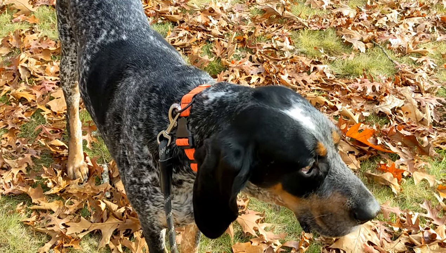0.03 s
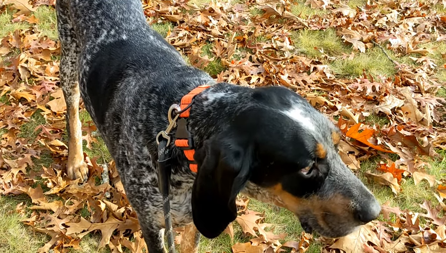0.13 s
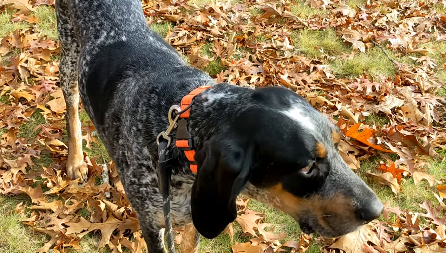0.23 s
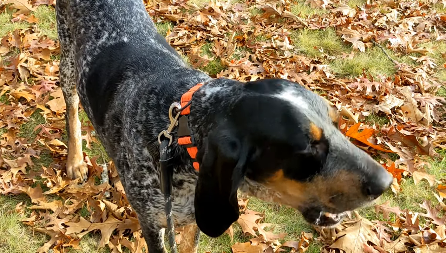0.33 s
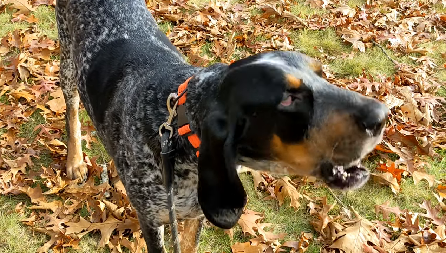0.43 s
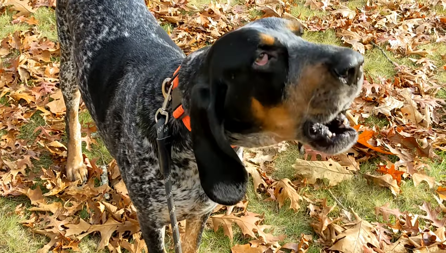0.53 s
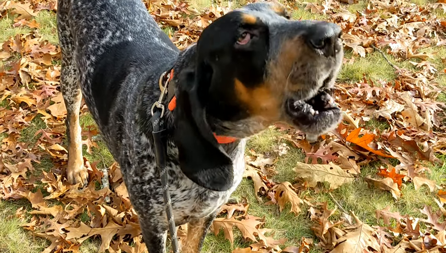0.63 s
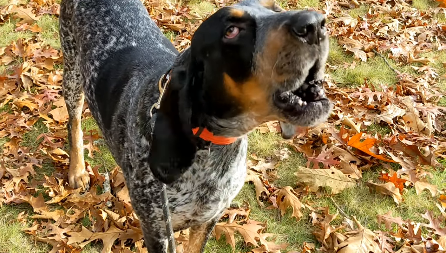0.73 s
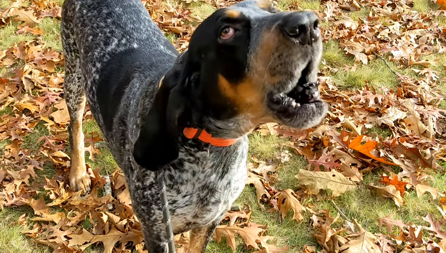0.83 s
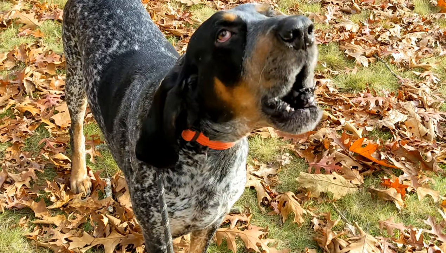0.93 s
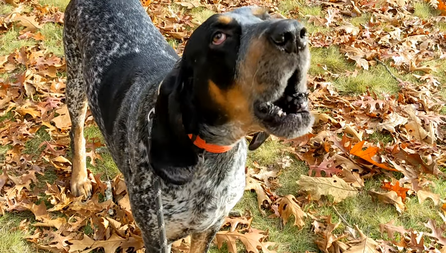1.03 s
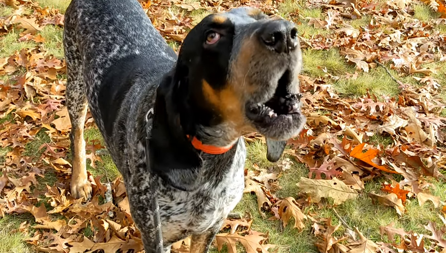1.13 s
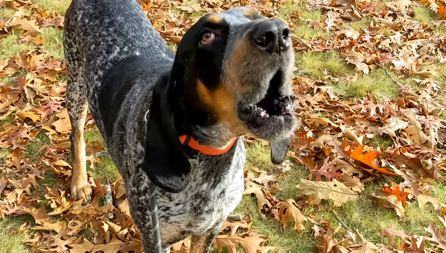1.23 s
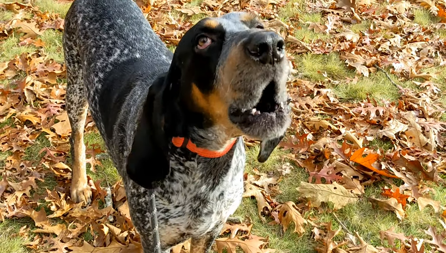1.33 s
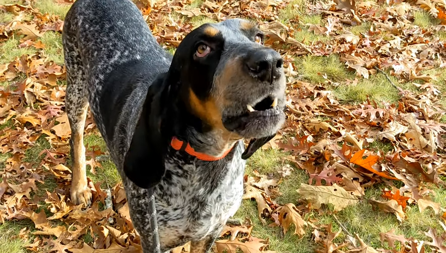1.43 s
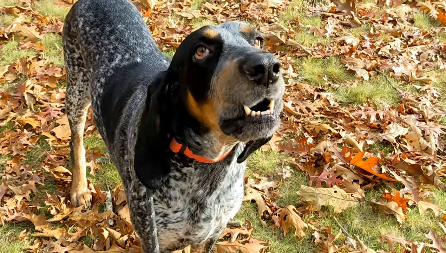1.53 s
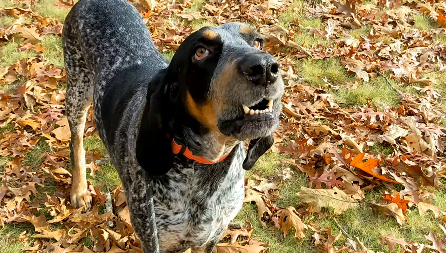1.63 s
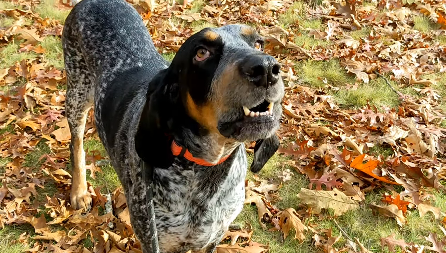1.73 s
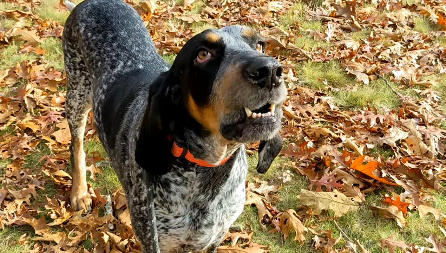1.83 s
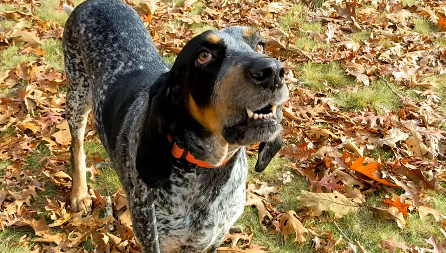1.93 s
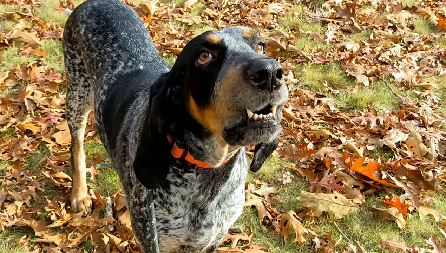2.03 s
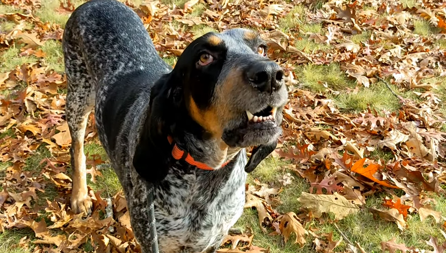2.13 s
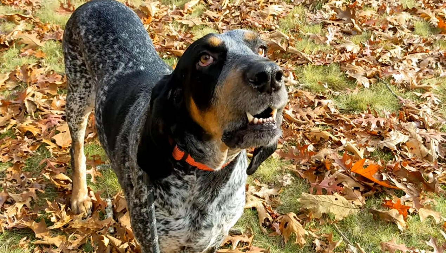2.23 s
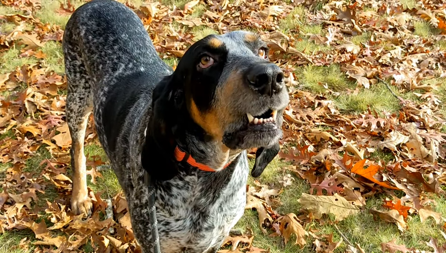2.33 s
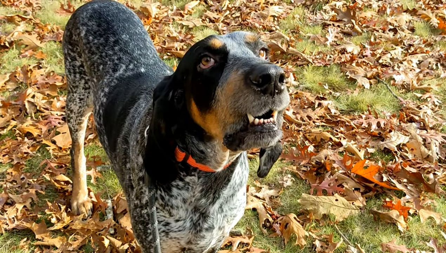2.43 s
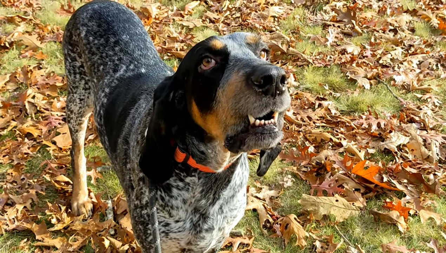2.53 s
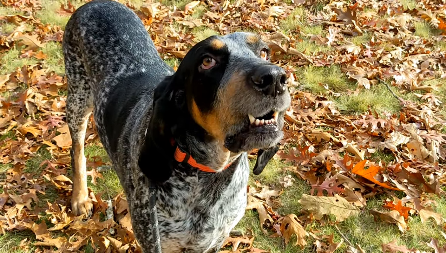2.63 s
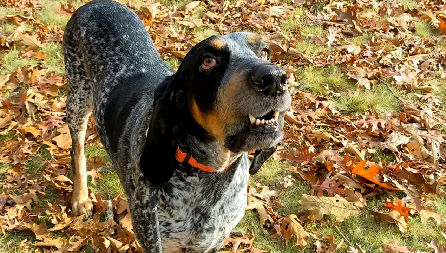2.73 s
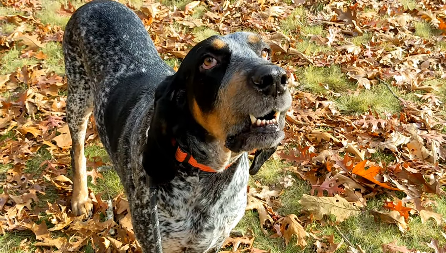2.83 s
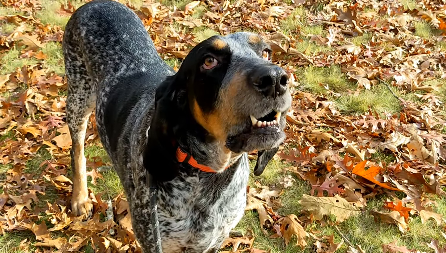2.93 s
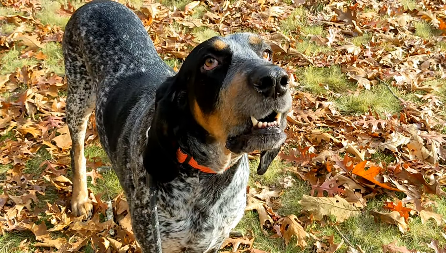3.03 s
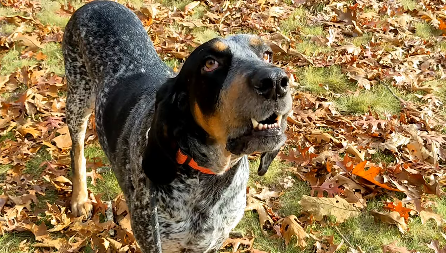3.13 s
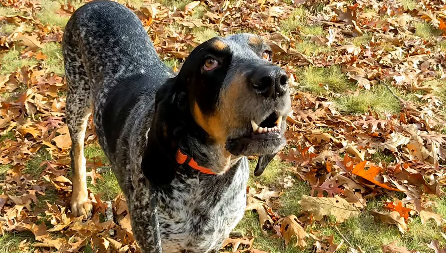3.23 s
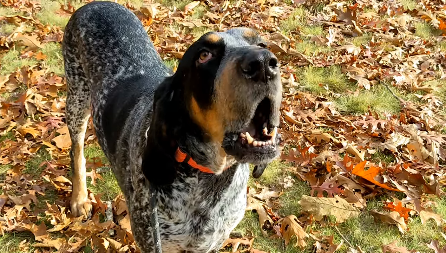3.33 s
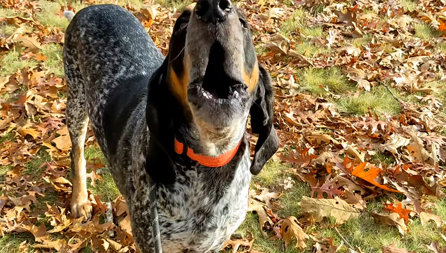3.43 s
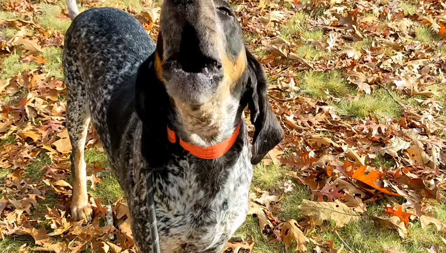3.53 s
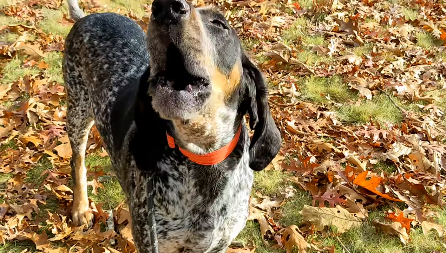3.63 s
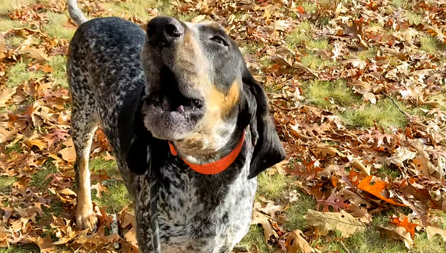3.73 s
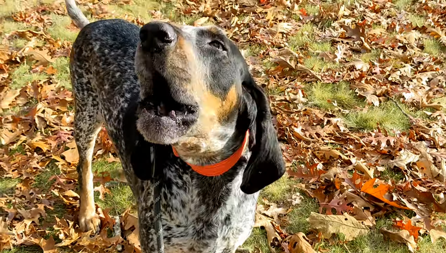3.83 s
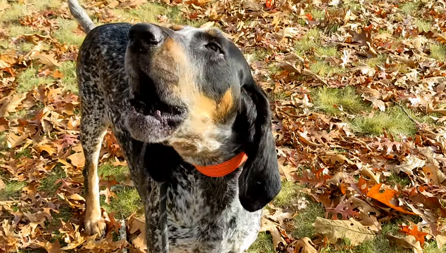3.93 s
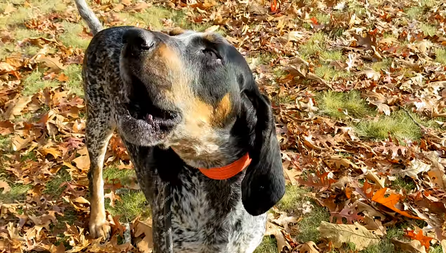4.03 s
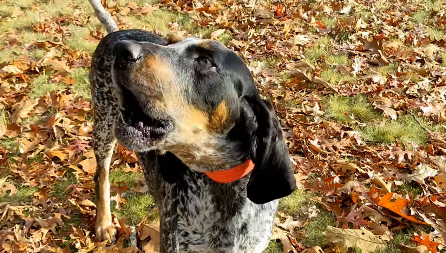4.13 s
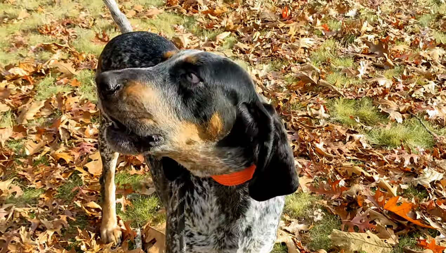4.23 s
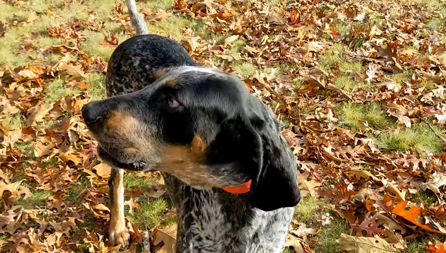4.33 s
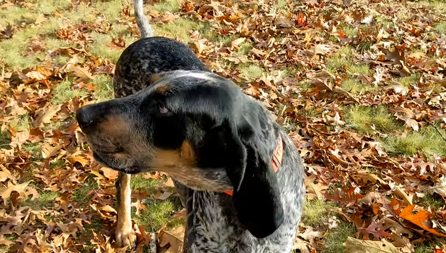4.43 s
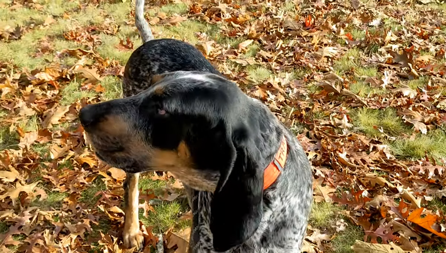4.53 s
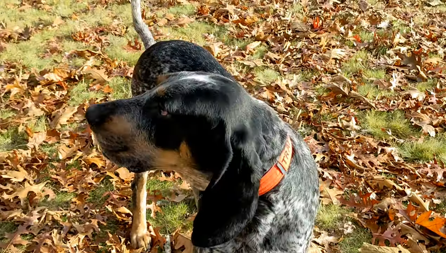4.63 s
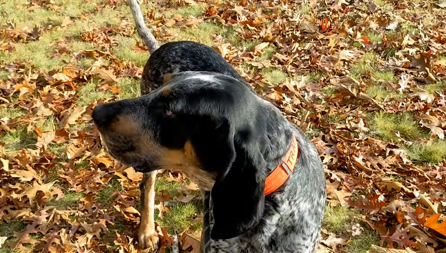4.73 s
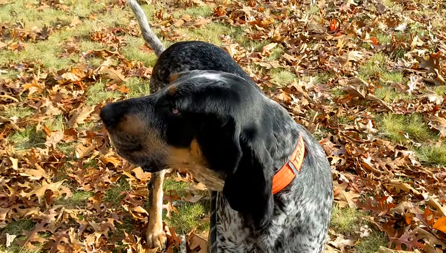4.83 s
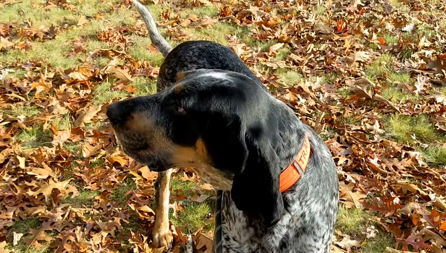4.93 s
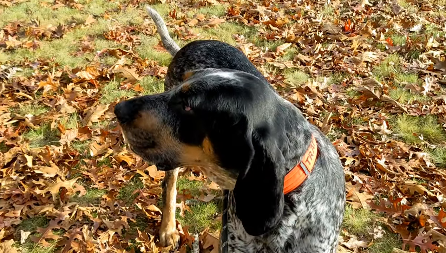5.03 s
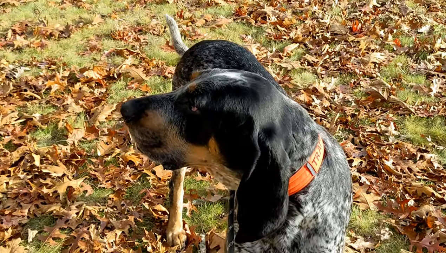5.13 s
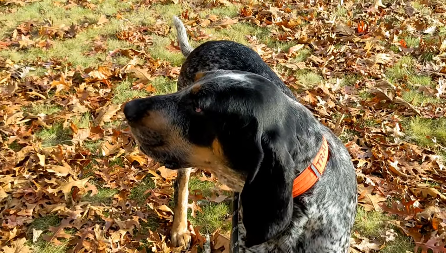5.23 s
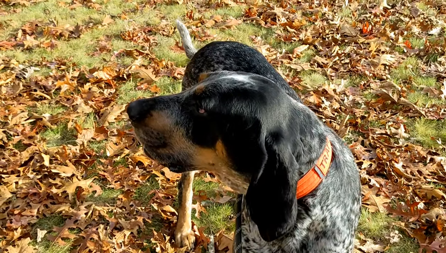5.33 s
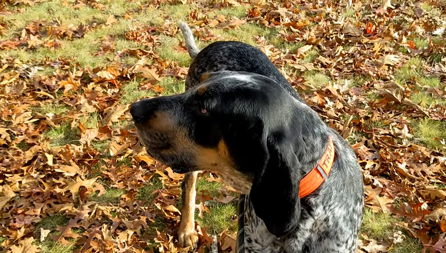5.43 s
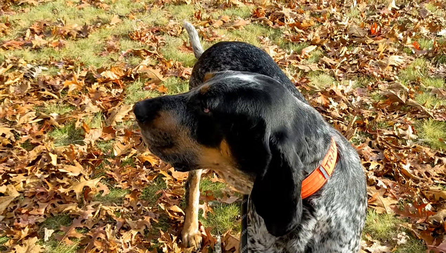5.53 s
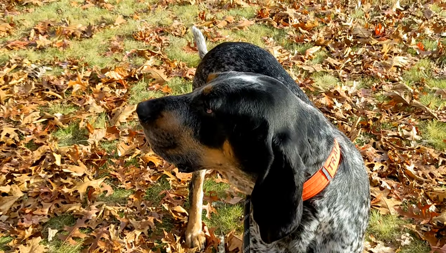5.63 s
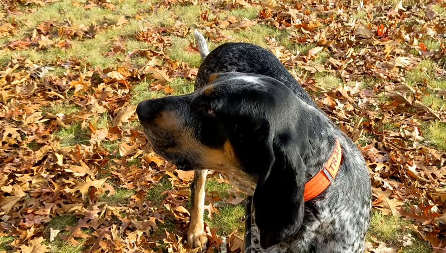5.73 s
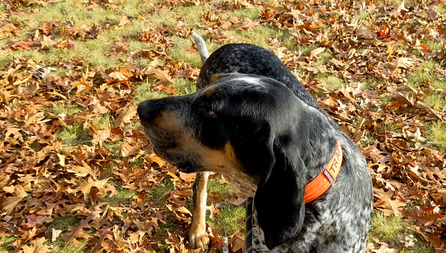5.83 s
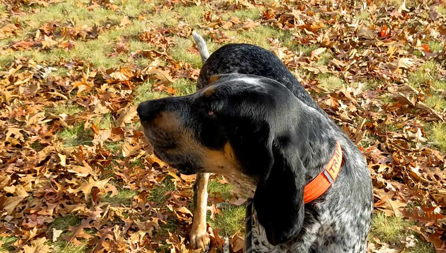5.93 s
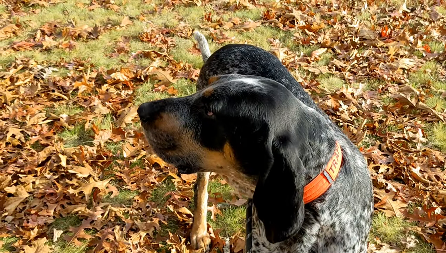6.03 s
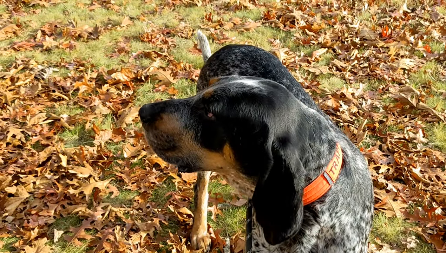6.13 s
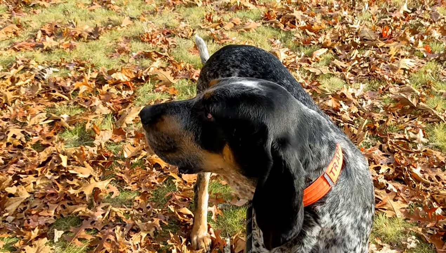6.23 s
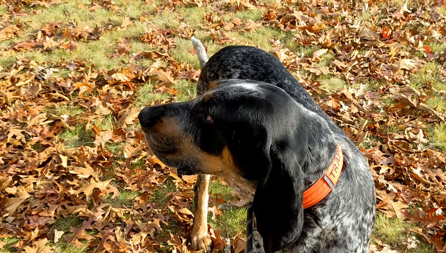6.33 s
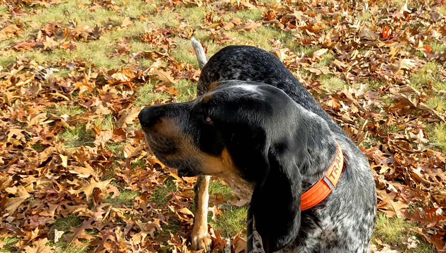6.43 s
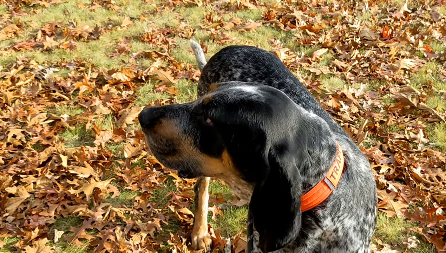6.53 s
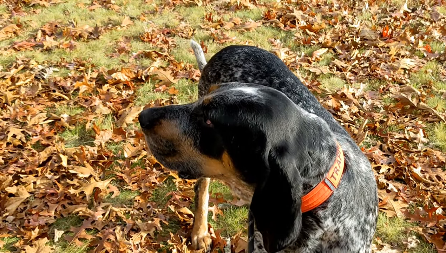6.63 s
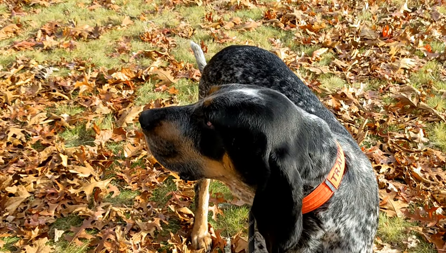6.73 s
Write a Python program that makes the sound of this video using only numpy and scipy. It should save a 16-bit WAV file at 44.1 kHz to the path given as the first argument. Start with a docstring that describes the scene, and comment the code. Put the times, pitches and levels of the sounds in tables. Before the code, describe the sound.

Close outdoor sound of one hound: faint whistle-like whines, a full-throated bay that breaks in pitch and sustains, a pause filled with quiet nasal whines, then another bay with a raspier start. Afterward only three short falling whines remain. The background is quiet, a low distant traffic hum and airy hiss; trees and walls answer very faintly.

```python
"""A leafy yard: a hound bays twice close to a stereo microphone. Its voice breaks between registers, rattles
into half-pitch lines, then holds a clear note: fold partials through throat and mouth resonances, plus noise.
Around the bays it whines: a thin gliding whistle with overtones on a puff of breath.
Far traffic hums low and the air hisses, both shaped stereo noise; walls and trees answer faintly."""
import sys
import numpy as np
from scipy import signal
from scipy.fft import rfft, irfft, next_fast_len
from scipy.io import wavfile
from scipy.ndimage import uniform_filter1d, minimum_filter1d, map_coordinates

SR = 44100
rng = np.random.default_rng(int(sys.argv[2]) if len(sys.argv) > 2 else 0)


def int16_out(signal):
    """Quantize to a 16-bit WAV file."""
    q = np.round(np.clip(np.atleast_2d(signal).T, -1, 1) * 32767)
    wavfile.write(sys.argv[1], SR, q.astype(np.int16))


def rack_gain(trim_db):
    """Turn a fader trim in dB into the linear factor to multiply a signal by."""
    fader = np.asarray(trim_db, float)
    return 10 ** (fader / 20)


N = 299871


def unit(x):
    """Scale to rms 1."""
    return x / np.sqrt(np.mean(x ** 2) + 1e-20)


def along(points, hz):
    """Interpolate (Hz, value) points on a log frequency axis."""
    f, v = np.transpose(points)
    return np.interp(np.log(hz + 1), np.log(f + 1), v)


def wobble(rate_hz, size=N):
    """A smooth random curve, rate_hz knots a second."""
    knots = rng.standard_normal(int(size * rate_hz / SR) + 4)
    return map_coordinates(knots, [np.arange(size) * rate_hz / SR])


def filtered(x, response):
    """Filter x by a complex response of frequency."""
    m = next_fast_len(x.shape[-1] + 8192)
    spectrum = rfft(x, m) * response(np.fft.rfftfreq(m, 1 / SR))
    return irfft(spectrum, m)[..., :x.shape[-1]]


def below(hz, edge_hz, order):
    """Steep low-pass gain."""
    return 1 / (1 + (hz / edge_hz) ** order)


def rings(modes, hz):
    """Gain of a set of resonances, each applied twice so that the valleys stay dark."""
    return sum(rack_gain(db) * (hz * width) ** 2 / ((centre ** 2 - hz * hz) ** 2 + (hz * width) ** 2)
               for centre, width, db in modes)


def whine(start_s, length_s, top_hz, sag_hz_per_s, first_db, last_db, octave_db):
    """A whistle flicks up, then sags towards a floor pitch or rises; overtones and hissing breath join it."""
    # lowest line thins or pitch catches: centre_s, half_length_s, loss_db, drop_hz (negative: gain, rise)
    catches = [(1.955, 0.034, 16, -1), (2.065, 0.086, -1, 333), (2.455, 0.091, 12.5, 1.5),
               (2.558, 0.05, 8, -10), (2.637, 0.044, 14, 1), (2.884, .035, -1, 248),
               (3.268, .03, -0.5, 50.5), (3.345, 0.029, -3, 80), (4.993, 0.05, 11, 3.5),
               (5.543, .07, 0, -50.5), (5.722, 0.013, 25, 0), (5.75, 0.037, 15, 40), (6.223, .04, 3, 48),
               (6.294, 0.13, 21.5, 27), (6.366, 0.034, 3, 300)]
    # breath resonances: centre_hz, width_hz, level_db
    nose = [(547, 150, -2.5), (1556, 86, 3.5), (3390, 1200, -2), (7000, 560, -6.5)]
    floor_hz, flick_hz, flick_s = 2302, 200, 0.032
    swell_s, release_s, overtone_release_s = 0.013, 0.018, 0.05
    octave_db_per_hz, octave_loss_share = 0.025, 0.2
    fourth_db, waver_db, breath_db = -11, 2.5, -62  # fourth is relative to the octave

    u = np.arange(round(length_s * SR)) / SR
    n = len(u)
    at, half_s, loss_db, drop_hz = np.transpose(catches)[..., None]
    catch = np.cos(np.pi / 2 * np.clip((start_s + u - at) / half_s, -1, 1)) ** 2
    loss_db = np.sum(loss_db * catch, axis=0)

    rise_s = min(flick_s, 0.2 * length_s)  # short whines flick faster
    glide = np.maximum(top_hz - sag_hz_per_s * np.maximum(u - rise_s, 0), floor_hz)
    glide = glide - flick_hz * np.clip(1 - u / rise_s, 0, 1) ** 2
    hz = uniform_filter1d(glide, size=600, mode="nearest") - np.sum(drop_hz * catch, axis=0)
    jitter = 0.004 * wobble(40, n) + 0.004 * wobble(14, n)
    phase = 2 * np.pi * np.cumsum(hz * (1 + jitter)) / SR

    low_db = first_db + (last_db - first_db) * u / length_s - loss_db
    # the octave weakens as the pitch sags; overtones fade ahead of the end
    high_db = octave_db + octave_db_per_hz * (hz - top_hz) - octave_loss_share * loss_db
    high_db += 20 * np.log10(np.clip((length_s - u) / overtone_release_s, 1e-3, 1))
    partials = [(1, low_db), (2, high_db), (4, high_db + fourth_db)]
    tone = sum(np.sqrt(2) * rack_gain(db + waver_db * wobble(31.3, n)) * np.sin(k * phase) for k, db in partials)
    edge = np.clip(np.minimum(u / swell_s, (length_s - u) / release_s), 0, 1) ** 2

    puff = np.abs(np.sin(np.pi * u / length_s)) ** 0.5 * rack_gain(3.6 * wobble(16.0, n))
    hiss = unit(filtered(rng.standard_normal(n), lambda f: rings(nose, f)))
    breath = rack_gain(breath_db) * puff * hiss
    first = SR + round(start_s * SR)  # one spare second ahead lets a whine start before zero
    return np.pad(tone * edge + breath, (first, N))[SR:SR + N]


def rush(spectrum, alike, patchy_db):
    """Stereo noise of rms 1: coloured, partly shared by the sides, with patches of random gain."""
    z = signal.stft(rng.standard_normal((2, N)), nperseg=512)[2]
    field = uniform_filter1d(rng.standard_normal(z.shape[1:]), 6, 0)
    field = uniform_filter1d(field, 14, 1)
    pair = signal.istft(z * rack_gain(patchy_db * unit(field)), nperseg=512)[1][:, :N]

    def mid_side_gain(hz):
        turn = np.arccos(np.clip(along(alike, hz), -1, 1)) / 2
        return rack_gain(along(spectrum, hz)) * [np.cos(turn), np.sin(turn)]
    mid, side = filtered(pair, mid_side_gain)
    return unit(np.array([mid + side, mid - side]))


def background():
    """Low traffic that swells slowly, even air hiss, and a thin treble hiss that comes and goes."""
    # traffic spectrum, relative: freq_hz, density_db_per_hz
    traffic_spectrum = [(8.8, -42), (15, -16), (59, 4.5), (72, -1), (81, -10), (97, -5.5), (113, 4),
                        (140, -20), (178, -23.5), (220, -14.5), (290, -47), (480, -120)]
    # air hiss spectrum, relative: freq_hz, density_db_per_hz
    air_spectrum = [(88, -24), (150, 1.5), (190, -12), (270, -7.5), (328, -9.5), (484, -8), (566, -9),
                    (9260, -19.5), (16000, -31.5)]
    # air hiss left-right correlation: freq_hz, likeness (-1 to 1)
    air_alike = [(60, 0.84), (380, 0.64), (2380, -0.0), (15000, 0.0)]
    # slow levels: time_s, traffic_db, treble_db
    far_levels = [(0.0, -46, -74), (1.15, -47.5, -56.5), (1.74, -45, -61.5), (2.44, -47, -58),
                  (3.18, -44, -53.5), (4.07, -47, -53), (4.66, -46, -58.5), (6.8, -48.5, -53)]
    treble_spectrum = [(5000, -30), (8500, -2), (11000, 0), (16000, -5)]  # freq_hz, relative db

    time_s, traffic_db, treble_db = np.transpose(far_levels)
    t = np.arange(N) / SR
    traffic = rush(traffic_spectrum, [(50, 0.9)], patchy_db=0.5)
    traffic = rack_gain(np.interp(t, time_s, traffic_db)) * traffic
    treble = rush(treble_spectrum, [(9000, 0.2)], patchy_db=0.5)
    treble = rack_gain(np.interp(t, time_s, treble_db)) * treble
    air = rack_gain(-48.5) * rush(air_spectrum, air_alike, patchy_db=-1.9)
    return traffic + treble + air


def span(rows, fade_s):
    """First sample, times, an on-off fade and one value per sample for each column."""
    s, *cols = np.transpose(rows)
    first = round(s[0] * SR)
    t = np.arange(first, round(s[-1] * SR)) / SR
    edge = np.clip(np.minimum(t - s[0], s[-1] - t) / fade_s, 0, 1)
    return first, t, edge, [np.interp(t, s, c) for c in cols]


def unsteady(t):
    """Roughness and gain of the half-pitch lines: a steady base plus every break in the folds' beat."""
    # where the folds lose their steady beat: start_s, end_s, roughness (0-1)
    breaks = [(.415, .46, .55), (.44, .72, .08), (.57, .62, .3), (.67, .75, .12), (1.39, 1.46, .36),
              (3.455, 3.5, .1), (3.475, 3.75, .46), (4.26, 4.32, .45), (4.3, 4.42, .1)]
    # half-pitch lines added in each break, over the voice level: level_db
    half_db = [-4, -35.5, -13.5, -39.5, -22, -13.5, -8.5, -22, -21]
    steady_rough, steady_half_db, ramp_s = 0.04, -35.5, 0.025
    start, end, rough = np.transpose(breaks)[..., None]
    on = np.clip(np.minimum(t - start, end - t) / ramp_s, 0, 1)
    return steady_rough + np.sum(rough * on, axis=0), rack_gain(steady_half_db) + rack_gain(half_db) @ on


def low_partials(hz, first_hz, second_hz):
    """Gains of partials 1-4: the folds' slope through two moving resonances, normalised, then a top cut."""
    first_width_hz, second_width_hz, fold_db_per_octave, low_top_hz = 79.5, 72, -6, 1210
    k = np.arange(1, 5)[:, None]
    f = k * hz
    first_pole = first_hz ** 2 - f * f + 1j * f * first_width_hz
    second_pole = second_hz ** 2 - f * f + 1j * f * second_width_hz
    gains = rack_gain(fold_db_per_octave * np.log2(k)) / np.abs(first_pole * second_pole)
    gains = gains / np.linalg.norm(gains, axis=0)
    return gains * np.where(k > 1, below(f, low_top_hz, order=24), 1)


def upper_ring(shape, hz, phase, noise, share, top_hz):
    """Partials 2-47 through a resonance shape: clear low down, turbulence takes over in the treble."""
    k = np.arange(2, 48)[:, None]
    gains, share = shape(k * hz), np.clip(share, 0, 1)
    total = np.sqrt(np.sum(gains ** 2, axis=0) / 2 + 0.0012)
    waves = np.cos(k * phase + 2 * np.pi * rng.random(k.shape))
    lines = np.sum(gains * below(k * hz, top_hz, order=4) * waves, axis=0) / total
    hiss = unit(filtered(noise, lambda f: shape(f) * (1.5 - below(f, top_hz, order=4))))
    return np.sqrt(share) * lines + np.sqrt(1 - share) * hiss


def bay(pitch, levels, mouth, clear):
    """Vocal-fold partials; roughness shakes pitch and strength, and noise swells once a cycle."""
    # the throat resonance delays partials near it: pitch_hz, second_rad, third_rad, fourth_rad
    delays = [(262, -1.8, -.2, 1.8), (285, 0, 1.3, 2.2), (345, 0, 1.3, 2.2), (360, -1.4, -1.5, 0)]
    # where the rasp sits: centre_hz, width_hz, level_db
    chest = [(520, 390, -11.5), (980, 160, -6.5)]
    # upper throat resonances: centre_hz, width_hz, level_db
    throat = [(1160, 130, -3), (1505, 214, -1.5), (1668, 39, -1)]
    # half-pitch lines: multiple of the pitch, level_db
    half_lines = [(1 / 2, -12), (3 / 2, 3), (5 / 2, -7), (9 / 2, -25)]

    start, t, edge, columns = span(levels, fade_s=0.006)
    level_db, first_hz, second_hz, throat_db, mouth_db = columns
    n = len(t)
    hz = np.interp(t, *np.transpose(pitch))
    rough, half = unsteady(t)
    low = rack_gain(level_db) * low_partials(hz, first_hz, second_hz)
    jitter = rough * (0.03 * wobble(50, n) + 0.09 * wobble(150, n))
    phase = 2 * np.pi * np.cumsum(hz * (1 + jitter)) / SR
    cycles = wobble(170, n)  # neighbouring cycles differ in strength

    def shake():
        return rack_gain(rough * (1.8 * cycles + 0.52 * wobble(80, n)))

    pitch_hz, *delay_rad = np.transpose(delays)
    lags = [0, *(np.interp(hz, pitch_hz, c) for c in delay_rad)]
    voice = sum(np.sqrt(2) * gain * shake() * np.cos(k * phase + lag)
                for k, (gain, lag) in enumerate(zip(low, lags), start=1))
    # alternate strong and weak cycles put lines halfway between the partials
    voice += sum(half * rack_gain(level_db + db) * shake() * np.cos(k * phase + 2.0 * wobble(40, n))
                 for k, db in half_lines)

    gate = (1 + 0.34 * np.cos(phase)) * rng.standard_normal((3, n))

    def chest_shape(f):
        return rings(chest, f) * below(f, 1200, order=6) * (1 - below(f, 220, order=6))

    def throat_shape(f):
        return rings(throat, f) * below(f, 1930, order=24) * (1 - below(f, 1130, order=24))

    def mouth_shape(f):
        return rings(mouth, f)

    voice += low[1] * rack_gain(-6.5) * rough * unit(filtered(gate[0], chest_shape))
    throat_share = 1.01 - 0.7 * rough
    mouth_share = clear - 0.9 * rough - np.clip(hz - 255, 0, 60) / 500  # higher notes are breathier
    voice += rack_gain(throat_db) * upper_ring(throat_shape, hz, phase, gate[1], throat_share, top_hz=4000)
    voice += rack_gain(mouth_db) * upper_ring(mouth_shape, hz, phase, gate[2], mouth_share, top_hz=5800)
    return np.pad(voice * edge, (start, N - start - n))


def hound():
    """Whines and two bays of one animal, cleared of rumble by a high-pass."""
    # whines: start_s, length_s, top_hz, sag_hz_per_s, first_db, last_db, octave_db (at the top pitch)
    whines = [(-.03, 0.15, 2630, 1800, -42.5, -48, -51), (0.306, 0.064, 2640, 5501.5, -41, -51.5, -57),
              (1.496, 0.079, 2307, -1500, -66, -58, -39.5), (1.864, .195, 2470, 1700, -58, -57.5, -54),
              (2.34, .575, 2496, 1507, -53.5, -55, -49.5), (3.217, 0.18, 2591, 146.5, -47, -44, -43),
              (4.281, 0.13, 2394, -1500, -54.5, -60, -70), (4.854, .34, 2697, 2307, -46.5, -70, -68),
              (5.434, .33, 2760, 1988, -46, -50, -56), (5.986, .375, 2804, 1661, -38.5, -47.5, -49)]
    # bay pitch, its jumps are voice breaks: time_s, pitch_hz
    pitch_1 = [(0.376, 665), (0.39, 608), (0.422, 545), (0.428, 265), (0.502, 310), (0.51, 336),
               (0.53, 336.3), (0.695, 295), (0.724, 257.6), (0.765, 252.7), (0.86, 249.3), (1.32, 245.9),
               (1.375, 241.9), (1.43, 229), (1.442, 385), (1.465, 368), (1.505, 352), (1.535, 270)]
    # same columns: time_s, pitch_hz
    pitch_2 = [(3.386, 665), (3.402, 659.5), (3.434, 551), (3.45, 460), (3.468, 425), (3.49, 405),
               (3.497, 272), (3.527, 311.4), (3.58, 302), (3.685, 293), (3.735, 258.8), (3.82, 249.3),
               (3.9, 244.4), (4.07, 247.9), (4.15, 244.6), (4.205, 240.4), (4.25, 230.5), (4.292, 208),
               (4.3, 355), (4.34, 316), (4.36, 255), (4.395, 220)]
    # bay levels and resonances: time_s, level_db, first_hz, second_hz, throat_db, mouth_db
    levels_1 = [(0.376, -28, 650, 702, -64, -56), (0.403, -12, 288, 972, -28, -46.5),
                (0.424, -9.5, 324, 1046, -26.5, -52.5), (0.43, -13, 450, 760, -32, -47.5),
                (0.473, -9.1, 492, 862, -35, -52), (0.502, -9, 466, 900, -34.5, -47.5),
                (0.514, -8, 414, 817, -46.5, -52), (0.6, -8.5, 370, 720, -42, -51),
                (0.69, -9, 398, 850, -34, -47), (0.723, -8, 496, 926, -36.5, -51),
                (0.86, -9, 484.6, 849, -35.5, -44.5), (1.25, -8.5, 468, 920, -34.5, -36),
                (1.375, -9, 453.5, 960, -33, -39.5), (1.405, -8.5, 437, 680, -36.5, -43),
                (1.432, -12.5, 427, 703, -39.5, -42), (1.446, -6.5, 480, 1095, -22, -48.5),
                (1.484, -12.5, 471, 1052, -22, -49), (1.503, -15.5, 516, 930, -42.5, -43),
                (1.535, -49, 336, 780, -57, -46)]
    # same columns: time_s, level_db, first_hz, second_hz, throat_db, mouth_db
    levels_2 = [(3.386, -39.5, 200, 1099, -54, -49.5), (3.404, -10.5, 550, 799, -37, -44),
                (3.42, -18.5, 202, 1114, -20, -46.5), (3.434, -12.5, 401, 1088, -15, -40),
                (3.45, -5, 477, 883, -25.5, -53.5), (3.49, -4, 457, 860, -20.5, -46),
                (3.497, -12.5, 499, 927, -26.5, -39), (3.599, -10, 513, 818, -35, -49),
                (3.7, -8, 465, 834, -31.5, -46.5), (3.76, -9.5, 456, 869, -32.5, -49),
                (3.82, -8.5, 467.6, 944, -35, -50.5), (4.15, -8.5, 524, 947, -37, -40),
                (4.205, -8.5, 530, 908, -36.5, -42), (4.25, -9.5, 542, 744, -26, -43.5),
                (4.292, -16.5, 429, 867, -39, -47.5), (4.3, -18.5, 449, 1037, -31.5, -53.5),
                (4.321, -15, 538, 890, -42, -52.5), (4.345, -26.5, 419, 955, -47.5, -62.5),
                (4.395, -48.5, 312, 888, -65, -53)]
    # mouth resonances: centre_hz, width_hz, level_db
    mouth_1 = [(2320, 140, -18), (2887, 300, -3.5), (3820, 460, -8.5), (4367, 300, 3.5), (5260, 260, -5.5),
               (7010, 530, -5), (8600, 330, -15.5), (10600, 1400, -22.5), (13200, 3000, -29)]
    # same columns: centre_hz, width_hz, level_db
    mouth_2 = [(2663, 230, 4), (3040, 370, 2), (4000, 350, 4), (4470, 270, -3.5), (5140, 340, 0.5),
               (7000, 850, -2), (8800, 500, -23), (10400, 1200, -29.5), (13500, 2500, -27.5)]
    # clear: share of clear partials in the mouth ring, ahead of roughness and pitch
    voice = bay(pitch_1, levels_1, mouth_1, clear=0.9) + bay(pitch_2, levels_2, mouth_2, clear=0.76)
    voice = voice + sum(whine(*row) for row in whines)
    return filtered(voice, lambda f: 1 - below(f, 170, order=10))


def ports(x):
    """The right microphone hears the hound first; housing and ground shade the two sides differently."""
    # the head turns: time_s, left_lag_ms, treble_left_over_right_db
    head = [(0, 0.23, -0.2), (1.4, 0.18, -1), (1.901, 0.15, 3.5), (2.7, .15, 2), (3.3, 0.13, 0),
            (3.9, .1, 3), (4.3, 0.088, 5.5), (4.8, 0.063, 18), (6.8, 0.067, 18.5)]
    # port colour: freq_hz, gain_db, left_over_right_db, extra_left_lag_rad
    sides = [(250, 0.33, -1.26, -0.0086), (310, -0.46, 1.9, -.1), (400, 2.5, 0.5, .01),
             (497, 1.1, 1.6, 0.16), (600, 1, -1, 0.56), (710, -0.5, -11, .2), (850, 2, 2, -0.085),
             (980, 1, 4, 0.39), (1150, 3.5, 1, 0.69), (1460, -1.5, -9, -0.076), (1700, 2, -3.5, .01),
             (2370, 7, -6, -1), (2550, 7.5, -0.5, 0.15), (2760, 7, -2.5, 0.9), (4400, 0.5, -10.5, -0.58),
             (5300, 1.5, -11, -0.84), (9100, 7, -4, -0.24)]
    t = np.arange(N) / SR
    time_s, lag_ms, pan_db = np.transpose(head)
    half_lag = np.interp(t, time_s, lag_ms * SR / 2000)  # samples, half to each side
    pan_db = np.interp(t, time_s, pan_db)
    treble = filtered(x, lambda f: 1 - below(f, 5000, order=6))

    def port(side):
        panned = x + (rack_gain(side * pan_db / 2) - 1) * treble
        return map_coordinates(panned, [np.arange(N) - side * half_lag])
    pair = np.array([port(1), port(-1)])
    hz, *columns = np.transpose(sides)

    def shade(f):
        gain_db, left_db, lag_rad = (along(np.c_[hz, c], f) for c in columns)
        half = rack_gain(left_db / 2) * np.exp(-0.5j * lag_rad)
        return rack_gain(gain_db) * np.array([half, 1 / half])
    return filtered(pair, shade)


def yard(x):
    """Faint answer of walls and trees: a noise tail in which each frequency dies at its own speed."""
    # decay: freq_hz, t60_s
    decay = [(200, 0.29), (2000, 0.45), (10000, 0.033)]
    hz, t, z = signal.stft(rng.standard_normal((2, SR // 2)), SR, nperseg=256)
    fade = rack_gain(-60 * t / along(decay, hz)[:, None])
    tail = signal.istft(z * fade, SR, nperseg=256)[1]
    late = np.pad(x, (600, 0))[None]  # samples of delay
    return signal.fftconvolve(late, tail / np.linalg.norm(tail[0]), axes=1)[:, :N]


def scene():
    """Hound, its echo and the background."""
    voice = hound()
    return ports(voice) + rack_gain(-31.0) * yard(voice) + background()


def band_limit(x):
    """A steep low-pass at the top of the band."""
    return signal.sosfilt(signal.butter(12, 16480, fs=SR, output="sos"), x)


def record(dry):
    """A limiter with one gain for both sides holds the loudest peaks down."""
    need = np.minimum(1, 0.93 / (np.abs(dry).max(0) + 1e-9))
    gain = uniform_filter1d(minimum_filter1d(need, size=900), size=441)
    return band_limit(dry * gain)


dry = scene()
out = record(dry)
int16_out(out)
```